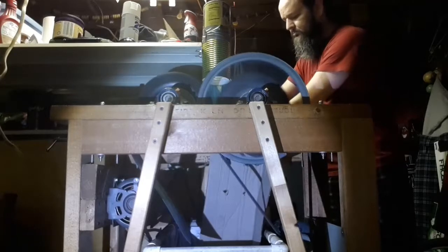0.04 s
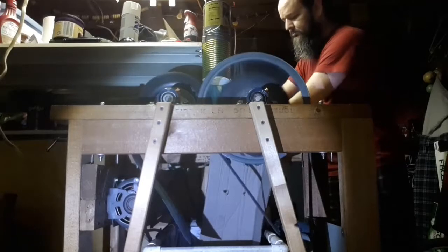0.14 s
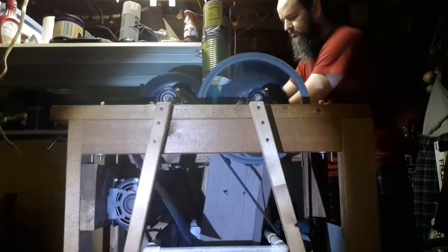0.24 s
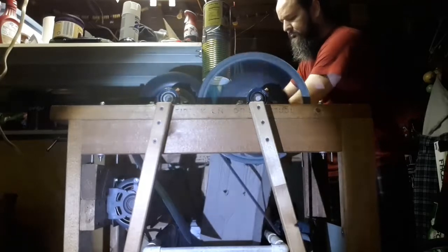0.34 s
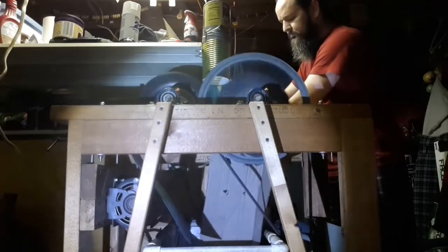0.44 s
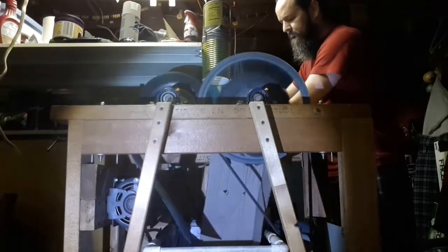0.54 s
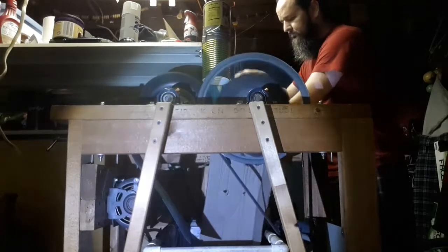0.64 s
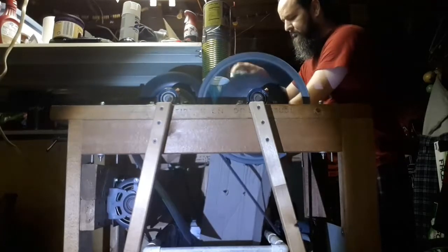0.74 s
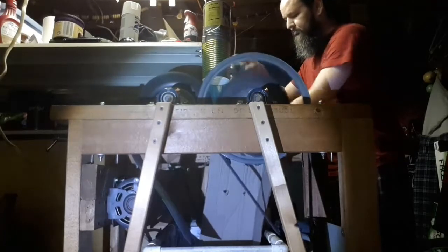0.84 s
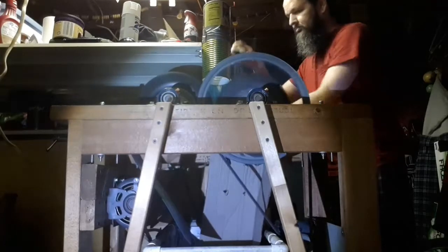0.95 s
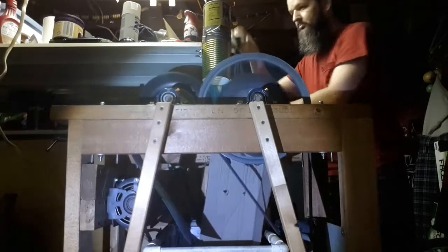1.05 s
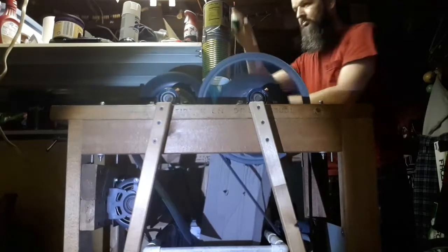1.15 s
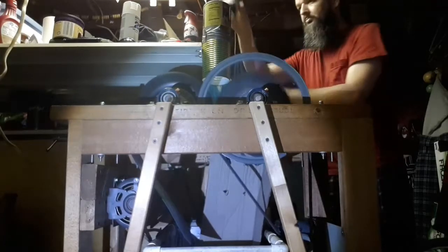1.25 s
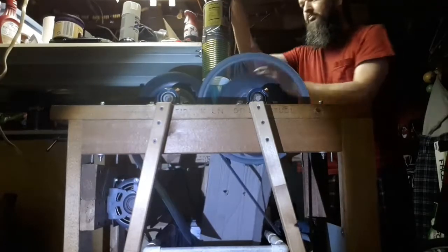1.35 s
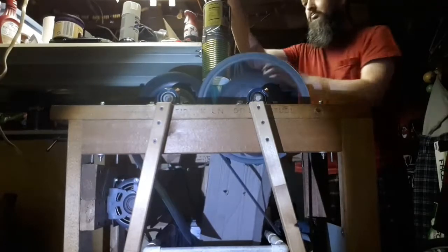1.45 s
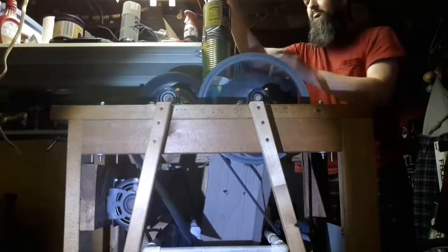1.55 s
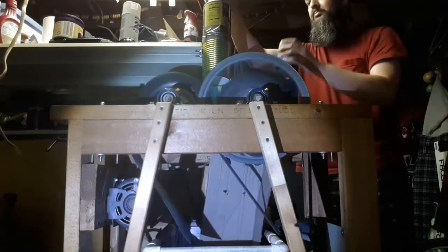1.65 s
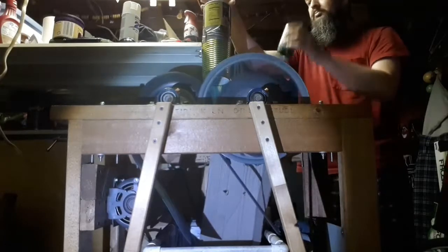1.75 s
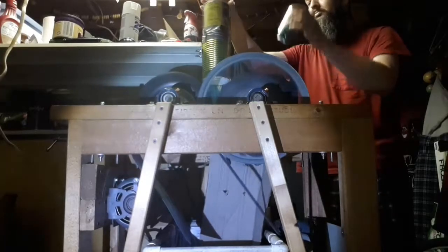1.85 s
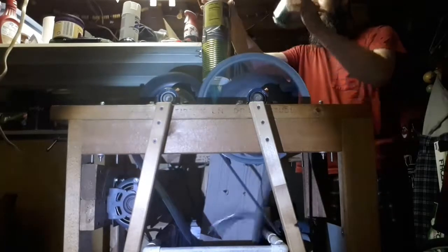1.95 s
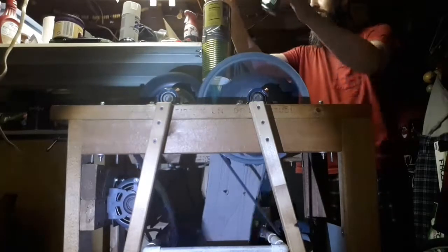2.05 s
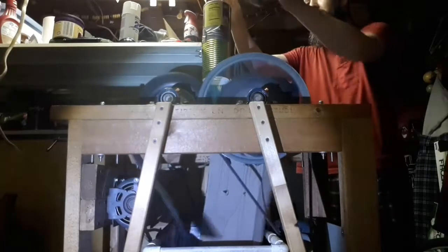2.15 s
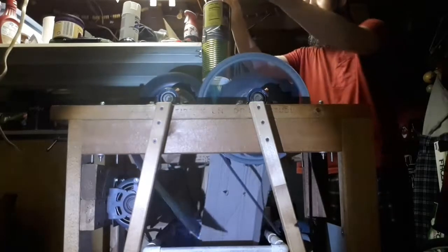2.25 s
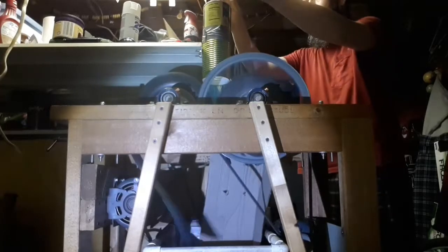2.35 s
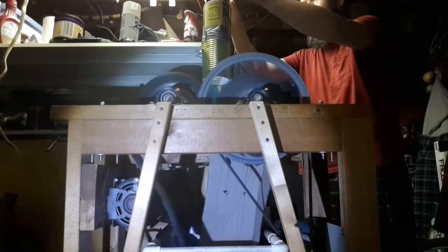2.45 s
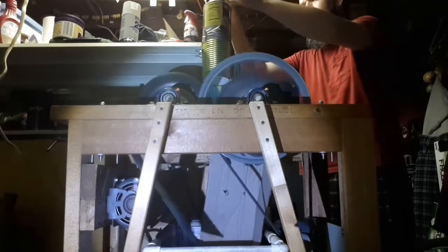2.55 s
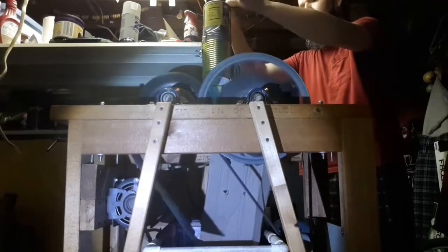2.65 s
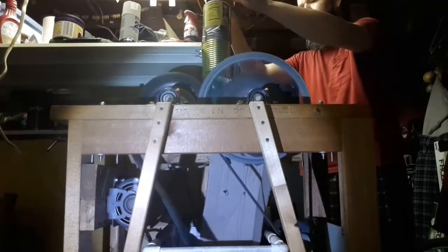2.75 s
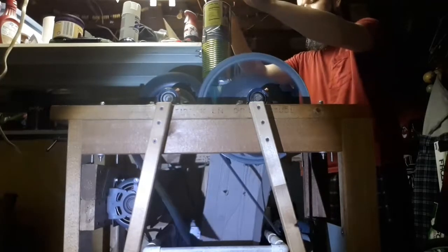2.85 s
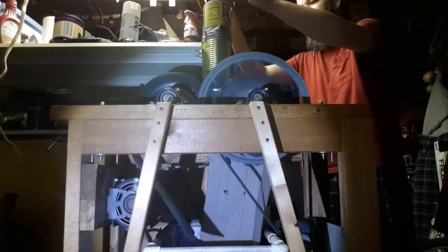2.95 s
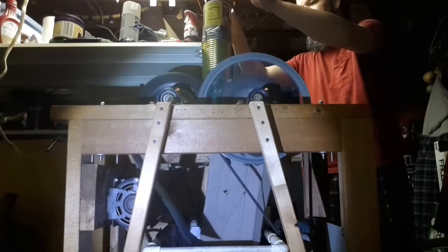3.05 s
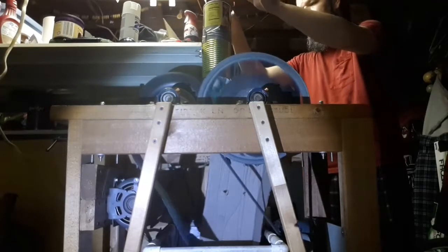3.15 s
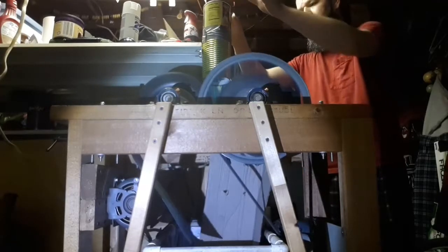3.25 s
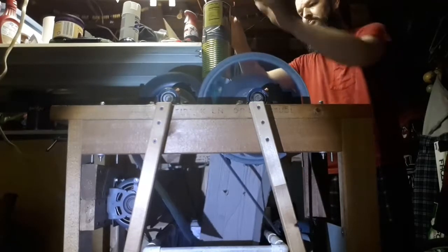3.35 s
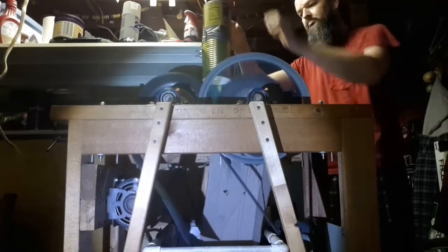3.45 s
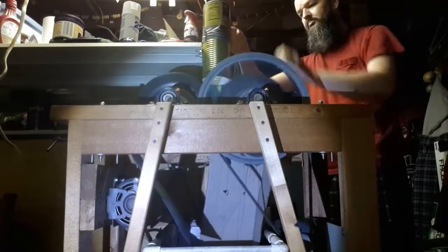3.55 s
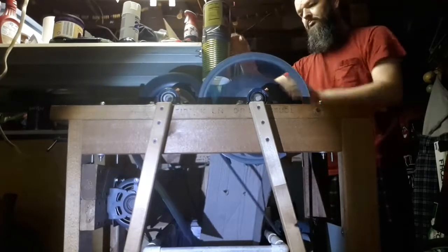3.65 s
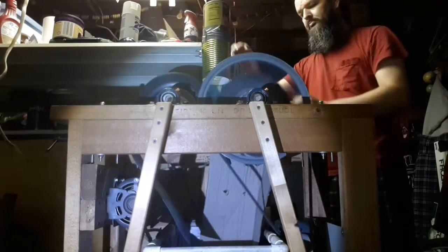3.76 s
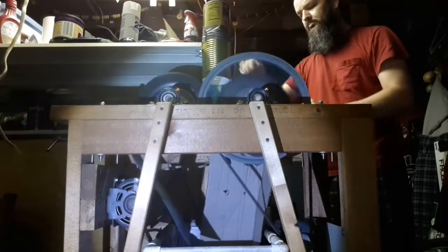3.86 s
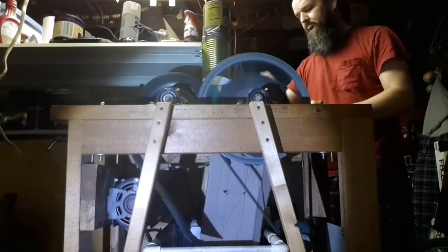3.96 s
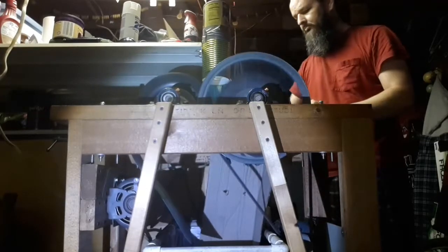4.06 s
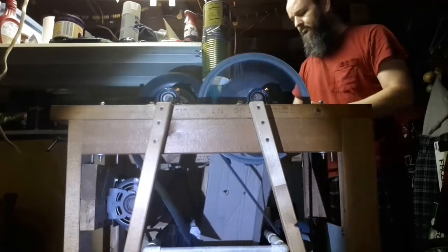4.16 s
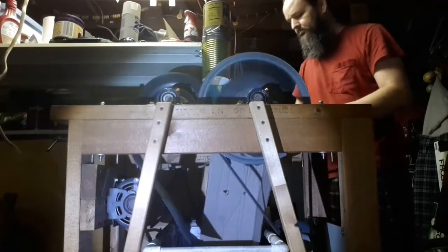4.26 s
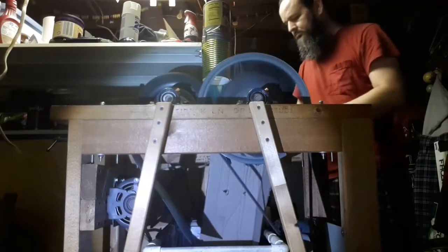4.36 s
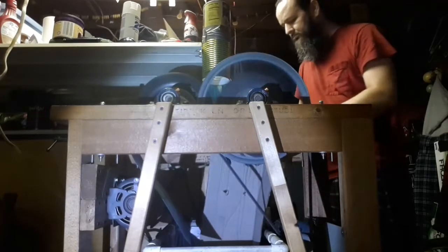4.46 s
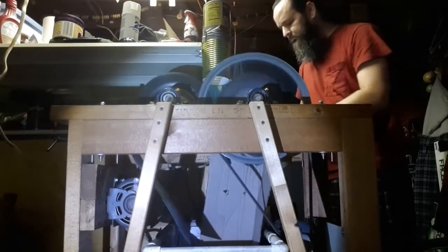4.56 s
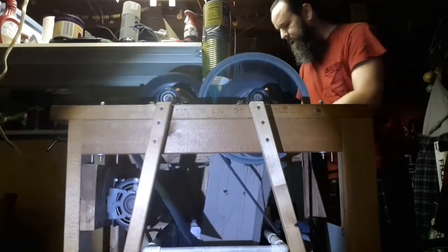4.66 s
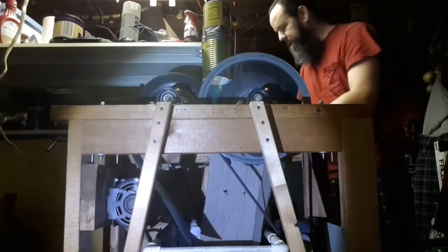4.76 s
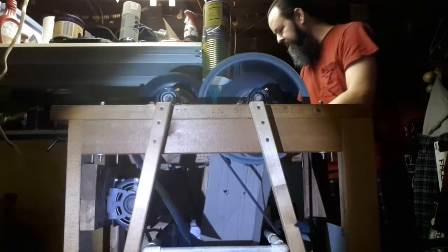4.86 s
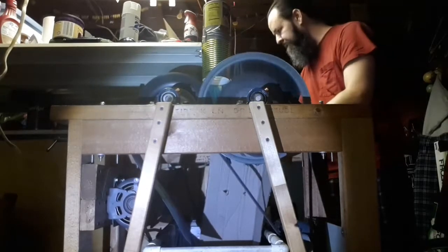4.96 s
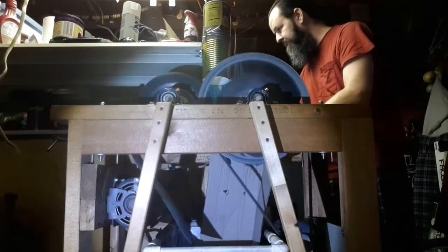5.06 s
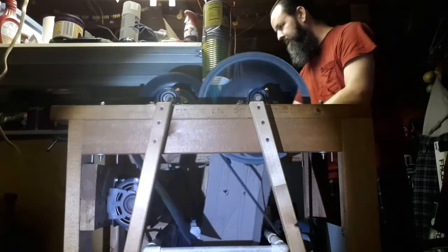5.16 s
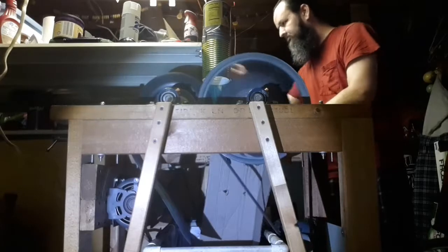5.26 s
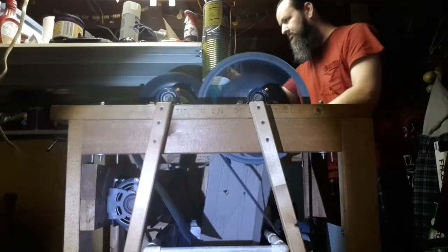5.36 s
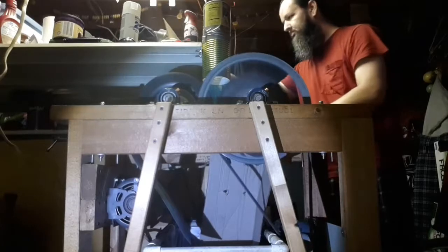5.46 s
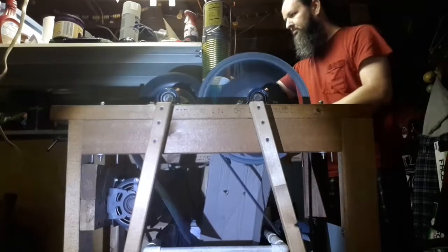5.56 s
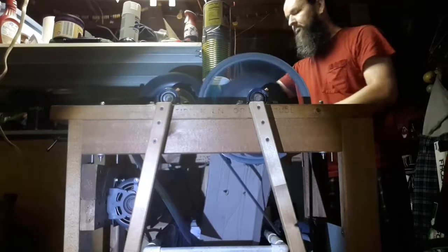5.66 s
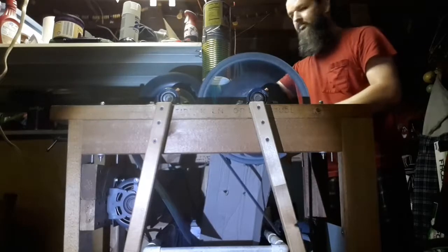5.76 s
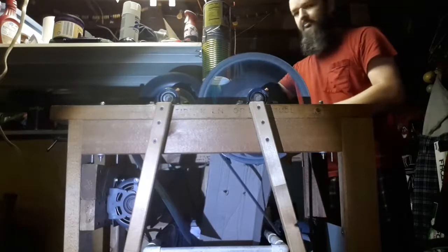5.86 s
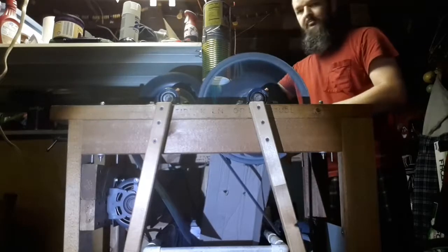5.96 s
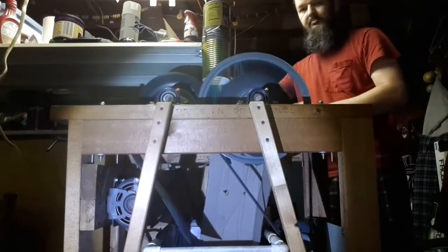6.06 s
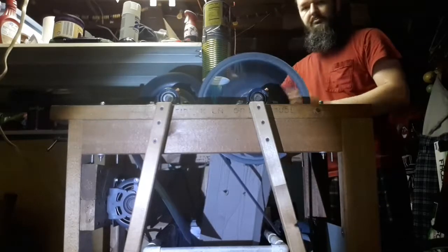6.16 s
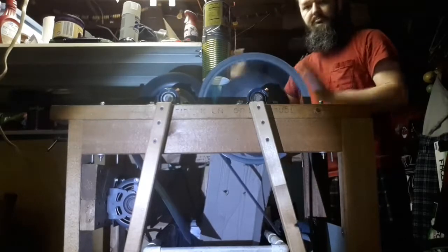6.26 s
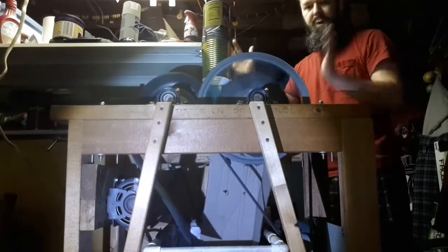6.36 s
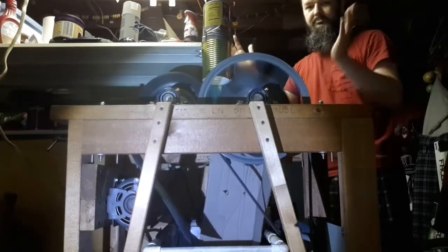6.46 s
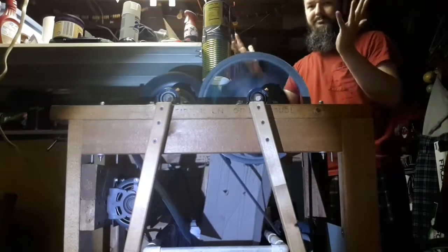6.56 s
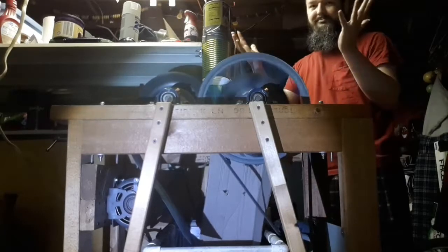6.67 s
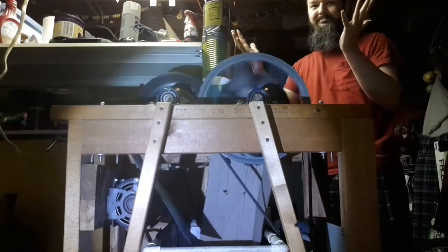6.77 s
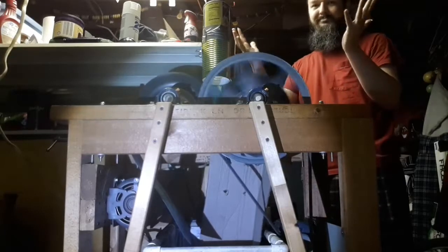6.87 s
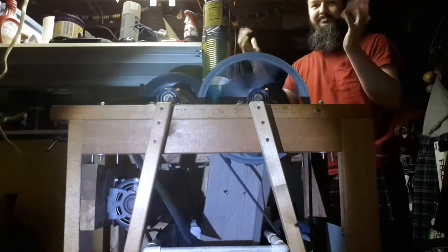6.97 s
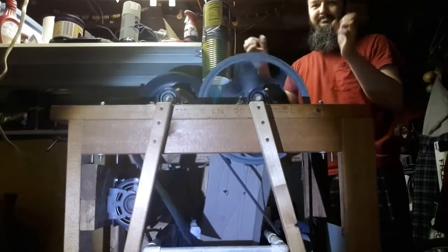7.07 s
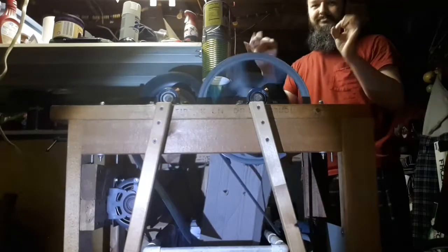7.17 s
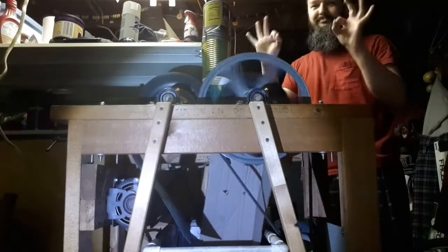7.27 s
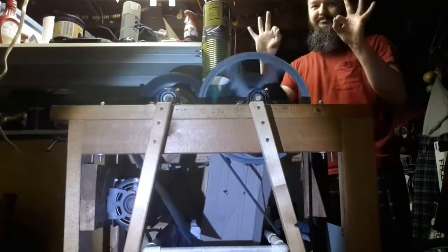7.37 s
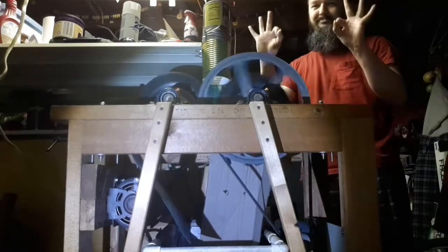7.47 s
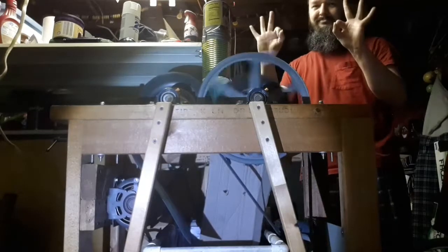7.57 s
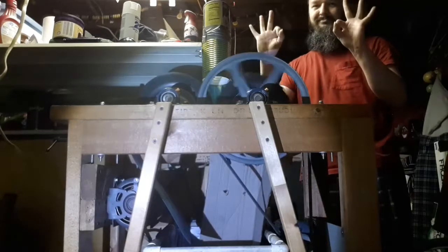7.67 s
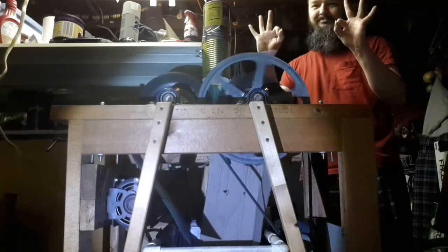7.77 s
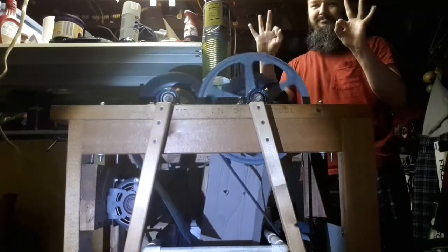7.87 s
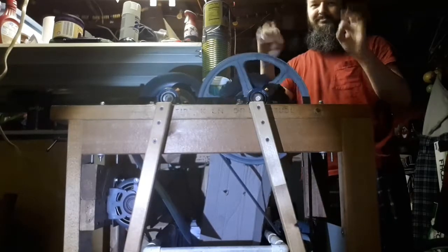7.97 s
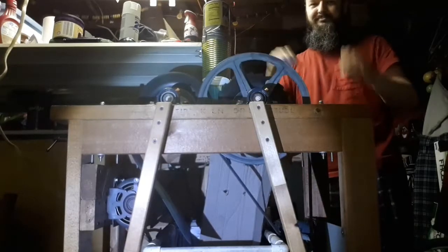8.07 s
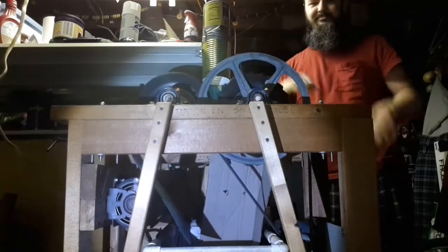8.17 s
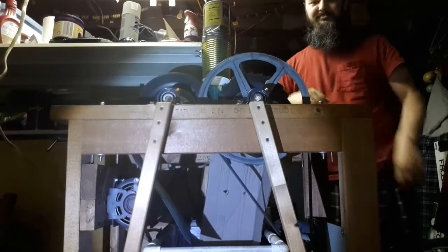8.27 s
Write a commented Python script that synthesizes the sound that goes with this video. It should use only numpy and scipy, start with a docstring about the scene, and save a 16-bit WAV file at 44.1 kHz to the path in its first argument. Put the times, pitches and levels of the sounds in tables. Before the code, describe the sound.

Close to a noisy motor-driven machine in a small dry room: raspy whirr, fast chirping buzz, metallic squeals and regular knocks. One thin can crumples violently and its flattened shell wobbles in a metal bin; a second clatters hollowly down a tube before an even sharper crunch and drop. After more running, the drive steadily winds down, squeals and knocks spreading apart, leaving a low drone and slowing ticks.

```python
"""A can crusher runs in a small workshop: filtered noise and fuzzy tones follow the speed of its motor,
which chirps once a turn, and of its belt wheel, which scrapes, squeals and knocks at fixed places.
A can is crushed in crackling noise bursts and drops into a ringing bin; another rattles down the feed
tube, waking its decaying modes, is crushed and drops too. Then the power is cut and the drive runs down
to a creep, while a second motor's steady drone stays and its ticks come ever more slowly."""
import sys
import numpy as np
from scipy import signal
from scipy.fft import rfft, irfft, next_fast_len
from scipy.io import wavfile
from scipy.ndimage import uniform_filter1d, minimum_filter1d

SR = 44100
rng = np.random.default_rng(int(sys.argv[2]) if len(sys.argv) > 2 else 0)


def wav_record(signal):
    """Record a signal, one row per channel, as 16-bit PCM in the file named by sys.argv[1]."""
    frames = np.transpose(np.atleast_2d(signal))
    bounded = np.clip(frames, -1, 1)
    # unit amplitude maps onto the largest positive 16-bit level
    quanta = np.round(bounded * 32767).astype(np.int16)
    wavfile.write(sys.argv[1], SR, quanta)


N = 367353
TIME = np.arange(N) / SR  # seconds


def gain_of(db):
    """The decibel law: a level difference becomes an amplitude ratio."""
    return 10 ** (np.asarray(db) / 20)


def evened(x):
    """Normalisation by mean power: the rms becomes one."""
    return x / np.sqrt(np.mean(x ** 2) + 1e-20)


def add(mix, s, sound):
    """Linear superposition: a sound is summed into the mix from time s in seconds."""
    part = mix[round(s * SR):][:len(sound)]
    part += sound[:len(part)]


def noise(size, spectrum, lo_hz, hi_hz, peaks=()):
    """Source-filter principle: white noise takes on a band of a spectrum and its resonances, at rms one."""
    hz = np.fft.rfftfreq(size, 1 / SR) + 1e-3  # keeps the logarithm finite at zero
    f, level = np.transpose(spectrum)
    db = np.interp(np.log(hz), np.log(f), level)
    for centre, width, lift in peaks:
        db = db + lift / (1 + (2 * (hz - centre) / width) ** 2)
    high_pass = 1 + (lo_hz / hz) ** 20
    low_pass = 1 + (hz / hi_hz) ** 20
    band = 1 / np.sqrt(high_pass * low_pass)
    white = rfft(rng.standard_normal(size))
    return evened(irfft(white * gain_of(db) * band, size))


def drift(size, rate_hz):
    """Low-pass random fluctuation: noise above the given rate is weakened, and the rms is one."""
    hz = np.fft.rfftfreq(size, 1 / SR)
    white = rfft(rng.standard_normal(size))
    return evened(irfft(white / (1 + (hz / rate_hz) ** 2), size))


def whistle(hz, width_hz):
    """Narrow-band noise: two random quadrature envelopes blur a tone that follows a pitch, at rms one."""
    angle = 2 * np.pi * np.cumsum(hz * np.ones(N)) / SR
    size = next_fast_len(N)
    in_phase = drift(size, width_hz)[:N] * np.cos(angle)
    quadrature = drift(size, width_hz)[:N] * np.sin(angle)
    return evened(in_phase + quadrature)


STRIKE_DB, STRIKE_S = 1.5, 0.0033  # extra level at first contact and its decay time


def blow(levels_db, spectrum, peaks, t60, hold_s, rise_s, crackle_db, fizz_life):
    """Impact excitation: a thud under crackling snaps holds briefly, then decays, the fizz soonest."""
    t = np.arange(2 ** 15) / SR
    fall_db = STRIKE_DB * np.exp(-t / STRIKE_S) - 60 * np.maximum(t - hold_s, 0) / t60
    thud_db, snap_db, fizz_db = levels_db
    thud = noise(len(t), spectrum, 160, 1230, peaks) * gain_of(thud_db + fall_db)
    thud = thud * (1 - np.exp(-t / 0.0023))
    snap = noise(len(t), spectrum, 1110, 6830, peaks) * gain_of(snap_db + fall_db)
    fizz = noise(len(t), spectrum, 6400, 17000, peaks) * gain_of(fizz_db + fall_db / fizz_life)
    crackle = evened(gain_of(crackle_db * drift(len(t), 380)))
    return thud + (snap + fizz) * crackle * (1 - np.exp(-t / rise_s))


def ring(modes):
    """Modal superposition: decaying sinusoids, weighted and detuned slightly anew at each blow."""
    t = np.arange(SR * 3 // 4) / SR
    chance = rng.uniform(-1.235, 1, (len(modes), 3))
    tones = np.zeros(len(t))
    for (hz, db, t60), (weight, detune, phase) in zip(modes, chance):
        level = gain_of(db + 2 * weight - 60 * t / t60)
        tones += level * np.sin(2 * np.pi * (hz * (1 + 0.0044 * detune) * t + phase))
    return tones * (1 - np.exp(-t / 0.0016)) * (1 - (t / t[-1]) ** 2)


def past(turns, place):
    """Phase of rotation: turns made past a place on the rim, within half a turn either way."""
    return (turns - place + .5) % 1 - .5


def whole_turns(turns):
    """Periodicity of rotation: the samples at which a new turn begins."""
    return np.flatnonzero(np.diff(np.floor(turns)) > 0)


RUN_TURNS_PER_S, LOAD_SAG_TURNS_PER_S = 29.43, .1  # motor speed, and its loss while crushing
LOAD_FROM_S, LOAD_TO_S = 1.9, 3.6
POWER_OFF_S, CREEP_TURNS_PER_S = 5.96, 2.8
BRAKE_TURNS_PER_S2, BRAKE_EASE_S = 14.58, 20  # initial deceleration, and the time over which it eases
BELT_RATIO, FIRST_CHIRP_S, FIRST_KNOCK_S = 5.42, .023, .118  # motor turns per wheel turn; start times


def motion():
    """Kinematics of rotation: drive speed in turns per second, integrated to shaft and belt wheel turns."""
    off_s = np.maximum(TIME - POWER_OFF_S, 0)
    lost = BRAKE_TURNS_PER_S2 * BRAKE_EASE_S * (1 - np.exp(-off_s / BRAKE_EASE_S))
    sag = LOAD_SAG_TURNS_PER_S * ((TIME > LOAD_FROM_S) & (TIME < LOAD_TO_S))
    speed = np.maximum(RUN_TURNS_PER_S - sag - lost, CREEP_TURNS_PER_S)
    turns = np.cumsum(speed) / SR
    shaft = turns - np.interp(FIRST_CHIRP_S, TIME, turns)
    wheel = (turns - np.interp(FIRST_KNOCK_S, TIME, turns)) / BELT_RATIO
    return speed, shaft, wheel


# Spectrum of the machine noise. Each row: frequency in Hz, relative level in dB.
MACHINE_SPECTRUM = [(24, -65), (40, -37.5), (290, -6.5), (382, -5.5), (516, 0.5), (680, -4), (918, -4.5),
                    (1150, -8), (1720, -9), (2000, -7.5), (2500, -9.5), (3470, -13.5), (5580, 0.5),
                    (8340, -22), (16000, -35)]
# Resonances of frame and motors. Each row: centre in Hz, width in Hz, lift in dB.
FRAME_RESONANCES = [(298, 180, 1), (546, 48, 0.5), (907, 76, 7), (1472, 72, 4.5), (1820, 23, 3.5),
                    (2060, 250, -4), (3030, 76.5, -6), (4355, 69, 6), (5440, 240, -0.5)]
# How hard the motor shaft rubs. Each row: time in seconds, relative level in dB.
SHAFT_RUB = [(0, -6.5), (.5, -0.5), (.75, -11), (1.0, -11), (1.25, 0.5), (1.5, -4), (1.85, -1), (2.3, -5),
             (4.1, 1), (4.45, -2), (5.7, 3.5), (6.5, 5)]
# levels at running speed before their fluctuations; each power is the exponent of relative speed
RUMBLE_DB, RUMBLE_POWER = -36.5, 0.95
WHIRR_DB, WHIRR_POWER = -36.5, 0.93
WHINE_DB, WHINE_POWER = -41.5, 2.3
HISS_DB, HISS_POWER = -31.5, 1.02
ROLL_DB, ROLL_PLACE, ROLL_SHARE = 2.5, 0.18, 0.058  # extra rumble after each knock; shares of a turn


def drive(speed, shaft, wheel):
    """Speed scaling of friction noise: bands of noise and a whine grow as powers of the drive's speed."""
    pace, size = speed / RUN_TURNS_PER_S, next_fast_len(N)
    rub_db = np.interp(TIME, *np.transpose(SHAFT_RUB))
    scrape_db, squeal = wheel_rubbing(wheel, pace)
    grit_db = (1.9 * drift(size, 164)[:N] + 1.0 * drift(size, 20)[:N]) * np.sqrt(pace)
    roll_db = ROLL_DB * pace * np.exp(-(past(wheel, ROLL_PLACE) / ROLL_SHARE) ** 2)

    rumble = noise(size, MACHINE_SPECTRUM, 20, 1250, FRAME_RESONANCES)[:N]
    rumble = rumble * gain_of(RUMBLE_DB + grit_db + roll_db) * pace ** RUMBLE_POWER
    whirr = noise(size, MACHINE_SPECTRUM, 1254, 3620, FRAME_RESONANCES)[:N]
    whirr_db = WHIRR_DB + 0.19 * rub_db + 1.1 * grit_db + 0.5 * scrape_db
    whirr = whirr * gain_of(whirr_db) * pace ** WHIRR_POWER
    whine = whistle(1700, 21) * gain_of(WHINE_DB + .5 * rub_db) * pace ** WHINE_POWER
    hiss = noise(size, MACHINE_SPECTRUM, 2900, 20000, FRAME_RESONANCES)[:N]
    hiss = hiss * gain_of(HISS_DB + grit_db + scrape_db * pace) * pace ** HISS_POWER
    return rumble + whirr + whine + hiss + squeal + chirping(speed, shaft, pace, rub_db)


# Rough spots on the belt wheel. Each row: place as a share of the turn after the knock, half length
# as a share of the turn, squeal level in dB at running speed, squeal pitch in Hz before it wavers and
# sinks, glide in Hz per half length.
WHEEL_SPOTS = [(.04, 0.0517, -34, 5250, 61), (.31, .11, -29.5, 5564, 128.5), (.72, .08, -28.5, 5847, -140)]
SPOT_SCRAPE_DB, SQUEAL_POWER = 2.5, 1.28  # lift of the scraping; exponent of relative speed
SQUEAL_WIDTH_HZ, SQUEAL_SINK_HZ = 90, 250  # roughness; fall of pitch towards standstill


def wheel_rubbing(wheel, pace):
    """Rotational modulation of friction: rough spots lift the scraping and squeal at fixed rim places."""
    scrape_db, squeal = -1.5, 0
    for place, share, db, hz, glide_hz in WHEEL_SPOTS:
        along = np.clip(past(wheel, place) / share, -3, 3)
        touch = np.exp(-along ** 2)
        scrape_db = scrape_db + SPOT_SCRAPE_DB * touch
        waver_hz = 130 * drift(next_fast_len(N), 16)[:N]
        pitch_hz = hz + glide_hz * along - SQUEAL_SINK_HZ * (1 - pace) + waver_hz
        tone = whistle(pitch_hz, SQUEAL_WIDTH_HZ)
        squeal = squeal + tone * touch * gain_of(db) * pace ** SQUEAL_POWER
    return scrape_db, squeal


CHIRP_HZ, CHIRP_SWEEP_HZ_PER_S, CHIRP_HALF_S = 2517, 116000, 0.0018  # mid pitch, sweep, half length
CHIRP_DB, CHIRP_POWER = -23.5, 1.5  # level before rub and chance; exponent of relative speed
SCUFF_DB, SCUFF_S = -9.5, .003  # noise within each chirp: level before the chirp's, half length


def chirping(speed, shaft, pace, rub_db):
    """Once-a-turn friction pulse: a high spot on the shaft rubs, sweeping the same pitches each time."""
    size = next_fast_len(N)
    away_s = past(shaft, 0) / speed
    cycles = CHIRP_HZ * away_s + CHIRP_SWEEP_HZ_PER_S * away_s ** 2 / 2
    tone = np.sin(2 * np.pi * cycles + 0.69 * drift(size, 350)[:N])
    tone = tone * np.exp(-(away_s / CHIRP_HALF_S) ** 2)
    scuff = noise(size, MACHINE_SPECTRUM, 1300, 4700, FRAME_RESONANCES)[:N]
    scuff = scuff * gain_of(SCUFF_DB) * np.exp(-(away_s / SCUFF_S) ** 2)
    level_db = CHIRP_DB + rub_db + 1.1 * drift(size, 19)[:N]
    return (tone + scuff) * gain_of(level_db) * pace ** CHIRP_POWER


# Dips of the running noise at the loud blows. Each row: start in seconds, depth in dB, hold in seconds.
NOISE_DIPS = [(1.868, 14.5, 0.47), (2.796, 10.5, 0.57), (3.47, 13, 0.62)]
DIP_ATTACK_S, DIP_RELEASE_S = 0.012, 0.31


def dipping():
    """Gain envelope: the running noise drops quickly at a loud blow, stays down and comes back."""
    dips_db = []
    for s, depth_db, hold_s in NOISE_DIPS:
        corners_s = np.cumsum([0, DIP_ATTACK_S, hold_s, DIP_RELEASE_S])
        dips_db.append(depth_db * np.interp(TIME - s, corners_s, [0, 1, 1, 0]))
    return gain_of(-np.max(dips_db, axis=0))


# The hard knocks. Each row: start in seconds, thud level in dB, scrape level in dB.
HARD_KNOCKS = [(.673, -21, -37), (1.275, -28.5, -43), (1.407, -24, -35), (1.775, -26.5, -41),
               (2.704, -26.5, -45), (4.188, -31.5, -36), (4.366, -26, -28.5), (4.554, -30, -26.5),
               (4.745, -24, -34), (4.936, -26.5, -35), (5.133, -23, -42), (5.286, -30.5, -28),
               (6.033, -23.5, -31.5), (6.233, -26.5, -26.5), (6.455, -26, -37), (6.714, -31.5, -24.5),
               (8.174, -36.5, -37.5)]
# Frame resonances that a knock wakes. Each row: centre in Hz, width in Hz, lift in dB.
KNOCK_RESONANCES = [(288, 43, 12.5), (546, 37, 9), (924, 280, 5)]
# usual levels at full speed, scatter from turn to turn, fizz against scrape
KNOCK_THUD_DB, KNOCK_SCRAPE_DB, KNOCK_SCATTER_DB, KNOCK_FIZZ_DB = -31.5, -33, 1.5, -6.5


def knocking(speed, wheel, dip):
    """Periodic impact: the belt joint hits once a wheel turn, softer as it slows; some knocks land hard."""
    out, hard_s = np.zeros(N), np.transpose(HARD_KNOCKS)[0]
    at = whole_turns(wheel)
    force_db = 20 * np.log10(speed[at] / RUN_TURNS_PER_S * dip[at])
    force_db = force_db + KNOCK_SCATTER_DB * rng.standard_normal(len(at))
    usual = []
    for s, db in zip(TIME[at], force_db):
        if min(abs(hard_s - s)) > .02:  # a hard knock replaces the usual one
            usual.append((s, KNOCK_THUD_DB + db, KNOCK_SCRAPE_DB + db))
    for s, thud_db, scrape_db in HARD_KNOCKS + usual:
        levels_db = [thud_db, scrape_db, scrape_db + KNOCK_FIZZ_DB]
        add(out, s, blow(levels_db, MACHINE_SPECTRUM, KNOCK_RESONANCES, t60=0.082, hold_s=0.0079,
                         rise_s=0.00058, crackle_db=1.0, fizz_life=0.96))
    return out


# Spectrum of the can noise. Each row: frequency in Hz, relative level in dB.
CAN_SPECTRUM = [(18, -47), (30, -33), (98, -40.5), (394, -8), (512, -3.5), (584, -7.5), (721, 0.5),
                (780, -7.5), (1910, -3), (2680, -5), (5450, -2), (7090, -12), (14800, -27), (16000, -27)]


def cans(rows, trim_db, wall_db, wall_width_hz, hold_s, rise_s, crackle_db):
    """Thin-shell resonance: aluminium crackles, with one resonance of the can wall standing out."""
    out = np.zeros(N)
    for s, thud, crunch, fizz, t60, wall_hz, *_ in rows:
        lift_db = wall_db - 3 * np.log2(wall_hz / 1900)  # low wall modes stand out most
        wall = [(wall_hz, wall_width_hz, lift_db), (530, 120, 4), (1050, 150, 3)]
        levels_db = np.add([thud, crunch, fizz], trim_db)
        add(out, s, blow(levels_db, CAN_SPECTRUM, wall, t60, hold_s, rise_s, crackle_db, fizz_life=0.83))
    return out


# Cans buckle under the ram. Each row: start in seconds, thud, crunch and fizz levels in dB before
# the trim, decay time t60 in seconds, pitch of the can wall in Hz.
CAN_CRUSHES = [(1.901, -21.5, -13.5, -40, 0.073, 1910), (1.906, -14, -4.5, -17, 0.21, 1950),
               (1.997, -21.5, -30, -39, 0.12, 2220), (2.112, -32.5, -32, -41, 0.074, 2010),
               (3.453, -28, -24.5, -43, 0.14, 1900), (3.487, -17.5, -27, -38, 0.27, 1600),
               (3.497, -15.5, -2, -12, 0.17, 3930)]


def crushing():
    """Buckling of a thin shell: the ram folds a can in a dense, loud crunch."""
    return cans(CAN_CRUSHES, trim_db=[-1, -1, -1], wall_db=9.5, wall_width_hz=290, hold_s=0.017,
                rise_s=0.001, crackle_db=1.5)


# A can strikes the feed tube. Each row: start in seconds, thud, clatter and fizz levels in dB before
# the trim, decay time t60 in seconds, pitch of the can wall in Hz, ring level in dB before its trim,
# depth down the tube from 0 to 1.
TUBE_STRIKES = [(2.78, -11.5, -16, -30, 0.07, 1244, -44, 0), (2.812, -16.5, -19, -32, 0.24, 1800, -27, 0),
                (2.838, -16, -5, -16, 0.31, 1835, -19.5, 0),
                (3.024, -15.5, -14.5, -31, 0.16, 2040, -32, 0.1),
                (3.046, -23.5, -15, -27, 0.22, 3200, -27, 0.2),
                (3.122, -21.5, -14.5, -26, 0.29, 1830, -22.5, 0.07),
                (3.164, -33, -20, -28.5, 0.27, 3500, -25, 0.33),
                (3.275, -21.5, -12, -21.5, 0.21, 1896, -23.5, 0.78)]
# Modes of the feed tube. Each row: frequency in Hz, relative level in dB when struck at the top,
# relative level in dB when struck at the bottom, decay time t60 in seconds.
TUBE_MODES = [(523, -4.5, -15, 0.55), (1015, 0, -34, 1.0), (1067, -21, -5, 1), (1416, -32, 7, 0.79),
              (1886, 17, -12, 0.073), (2115, -2.5, -8, 0.45), (2476, -5.5, -9, 1), (2870, -14, -4, 0.49),
              (3170, 1, -27, 0.27), (3490, -3, -7, 0.82), (3490, -6, -2, 0.7), (3750, -6, 0, 0.56),
              (4260, -23, -23, .33), (4300, -15, -14, .3), (4530, -6, -5, 0.51), (4560, -6, 0, 0.51),
              (5000, -12, -6, 0.75), (4970, -4, 4, 0.36), (5600, -18, -16, 0.36), (5860, -16, -4, 0.55),
              (6300, -9, 2, 0.35)]
PARTNER_SHARE, PARTNER_DB = .015, -5.5  # the tube is not quite round: each mode has a lower, weaker partner


def feeding():
    """Position-dependent modal excitation: a can rings the tube as it falls, until the ram grips it."""
    out = cans(TUBE_STRIKES, trim_db=[-1.5, -1.5, -1.5], wall_db=10.0, wall_width_hz=114, hold_s=0.0041,
               rise_s=0.0012, crackle_db=1.5)
    ringing = np.zeros(N)
    for s, *_, ring_db, depth in TUBE_STRIKES:
        modes = [(hz, top + depth * (bottom - top), t60) for hz, top, bottom, t60 in TUBE_MODES]
        partners = [(hz * (1 - PARTNER_SHARE), db + PARTNER_DB, t60) for hz, db, t60 in modes]
        add(ringing, s, gain_of(ring_db - 0.3) * ring(modes + partners))
    return out + ringing * np.interp(TIME, [3.45, 3.55], [1, 0])


# Flattened cans drop and bounce. Each row: start in seconds, thud, clatter and fizz levels in dB
# before the trim, decay time t60 in seconds, pitch of the can wall in Hz.
CAN_DROPS = [(2.25, -33, -17, -37.5, 0.13, 5260), (2.339, -16.5, -14, -30, 0.22, 1150),
             (2.401, -25, -21, -35.5, 0.36, 1520), (3.79, -20, -14, -28.5, 0.22, 2720),
             (3.994, -38.5, -37, -53, 0.094, 4960)]
# Modes of the bin under the machine. Each row: frequency in Hz, relative level in dB, t60 in seconds.
BIN_MODES = [(514, -3, 0.61), (613, -2, 0.48), (750, -24, 0.34), (826, -4, 0.67), (1376, -10, 0.69)]
# a flat can wobbles on the bin floor while its rim rasps: initial levels and fades
WOBBLE_S, WOBBLE_LENGTH_S = 2.345, 0.35
WOBBLE_DB, WOBBLE_FADE_DB_PER_S = -26.5, 37
RASP_DB, RASP_FADE_DB_PER_S = -33.5, 25


def dropping():
    """Forced and free vibration: flat cans clatter into the bin, which booms as they land and wobble."""
    out = cans(CAN_DROPS, trim_db=[-2, -1, -1], wall_db=5.0, wall_width_hz=200, hold_s=0.0065,
               rise_s=0.001, crackle_db=0.5)
    for s, thud_db, *_ in CAN_DROPS:
        add(out, s, gain_of(thud_db - 11.5) * ring(BIN_MODES))
    t = np.arange(0, WOBBLE_LENGTH_S, 1 / SR)
    edges = np.clip(np.minimum(t, WOBBLE_LENGTH_S - t) / .008, 0, 1)
    boom = evened(sum(gain_of(db) * whistle(hz, 43) for hz, db, _ in BIN_MODES))
    boom = boom[:len(t)] * gain_of(WOBBLE_DB - WOBBLE_FADE_DB_PER_S * t)
    rasp_db = RASP_DB - RASP_FADE_DB_PER_S * t + 3.5 * drift(len(t), 60)
    rasp = noise(len(t), CAN_SPECTRUM, 460, 1720) * gain_of(rasp_db)
    add(out, WOBBLE_S, edges * (rasp + boom))
    return out


# Dry metal catches on the wheel. Each row: start in seconds, level in dB before a 5 dB lift.
WHEEL_CHINKS = [(.051, -24.5), (.788, -23), (1.652, -22), (1.712, -25), (4.297, -22.5), (4.366, -24.5),
                (4.482, -24), (6.623, -35)]


def chinking():
    """Short damped contact: narrow-band noise with a fast decay gives bright catches of metal on metal."""
    out, t = np.zeros(N), np.arange(4096) / SR
    for s, db in WHEEL_CHINKS:
        envelope = (1 - np.exp(-t / 0.00091)) * np.exp(-t / 0.006)
        add(out, s, noise(len(t), MACHINE_SPECTRUM, 5440, 6400) * gain_of(db + 5.0) * envelope)
    return out


# Spectrum of the tick. Each row: frequency in Hz, relative level in dB.
TICK_SPECTRUM = [(100, -34), (600, -5), (1500, -4), (3000, -5), (4500, -5), (5600, -0.5), (7000, -10),
                 (9500, -31), (11300, -2), (12500, -13), (14500, -26)]
# Resonances of the ticking part. Each row: centre in Hz, width in Hz, lift in dB.
TICK_RESONANCES = [(6050, 730, 6), (800, 400, 6.5)]
FIRST_TICK_S, TICKS_PER_S, TICK_SLOWING_PER_S2 = 7.159, 7.89, 1.65  # start, initial rate, slowing
TICK_THUD_DB, TICK_CLICK_DB, TICK_FIZZ_DB, TICK_GROWTH_DB_PER_S = -38.5, -37.5, -57, 3.5  # initial levels


def ticking():
    """Decelerating periodic impact: the coasting second motor ticks once a turn, more firmly as it slows."""
    out, since_s = np.zeros(N), TIME - FIRST_TICK_S
    turns = TICKS_PER_S * since_s - TICK_SLOWING_PER_S2 * since_s ** 2 / 2
    for at in whole_turns(np.maximum(turns, -.5)):
        growth_db = TICK_GROWTH_DB_PER_S * since_s[at]
        levels_db = np.add([TICK_THUD_DB, TICK_CLICK_DB, TICK_FIZZ_DB], growth_db)
        add(out, TIME[at], blow(levels_db, TICK_SPECTRUM, TICK_RESONANCES, t60=0.1, hold_s=0.0027,
                                rise_s=0.00086, crackle_db=-2.0, fizz_life=0.78))
    return out


def coasting():
    """Stationary band noise: the second motor's bearings drone steadily, whatever the drive's speed."""
    return noise(next_fast_len(N), MACHINE_SPECTRUM, 584, 960)[:N] * gain_of(-49)


def workshop(x, t60, wet_db):
    """Reverberation by convolution: a small cluttered room gives sparse reflections that die quickly."""
    t = np.arange(SR // 2) / SR
    reflected = rng.random(len(t)) < 2000 / SR  # about 2000 reflections a second
    taps = rng.standard_normal(len(t)) * reflected * (t > .004)
    tail = signal.lfilter(*signal.butter(1, 6000, fs=SR), taps * gain_of(-60 * t / t60))
    return x + gain_of(wet_db) * signal.fftconvolve(x, tail / np.linalg.norm(tail))[:N]


def scene():
    """Superposition at one microphone: all sources and the room add up, alike in both channels."""
    speed, shaft, wheel = motion()
    dip = dipping()
    running = (drive(speed, shaft, wheel) + coasting()) * dip
    machine = running + knocking(speed, wheel, dip) + ticking() + chinking()
    sound = workshop(machine + crushing() + dropping() + feeding(), t60=0.19, wet_db=-16.5)
    return np.array([sound, sound])


LIMIT, LIMIT_WINDOW_S = 1, .0004  # amplitude ceiling, and the span that smooths the gain
EDGE_HZ = 16050


def record(dry):
    """Peak limiting and band limiting: loud peaks are held down, deep bass and the top octave trimmed."""
    window = round(LIMIT_WINDOW_S * SR)
    room = LIMIT / np.maximum(abs(dry), LIMIT)
    limited = dry * uniform_filter1d(minimum_filter1d(room, window), window)
    thinned = signal.lfilter(*signal.butter(1, 45, "high", fs=SR), limited)
    low_pass = signal.firwin(511, EDGE_HZ, window=("kaiser", 9), fs=SR)
    return signal.oaconvolve(thinned, low_pass[None], "same")


dry = scene()
out = record(dry)
wav_record(out)
```